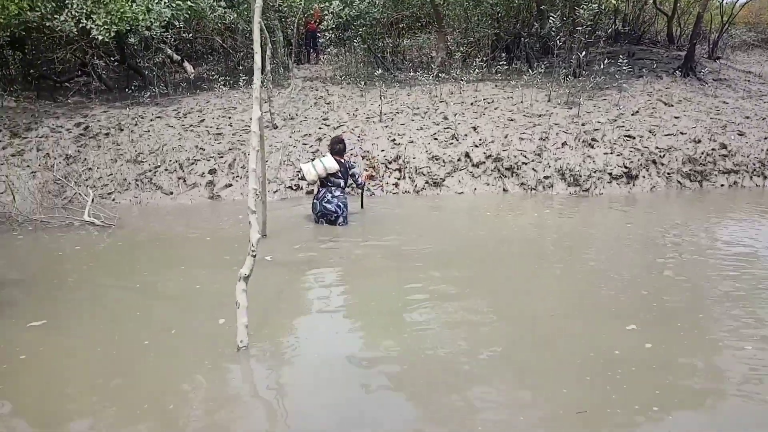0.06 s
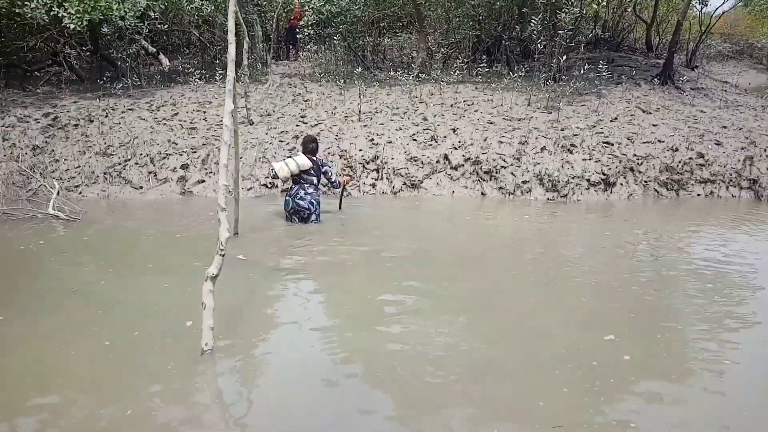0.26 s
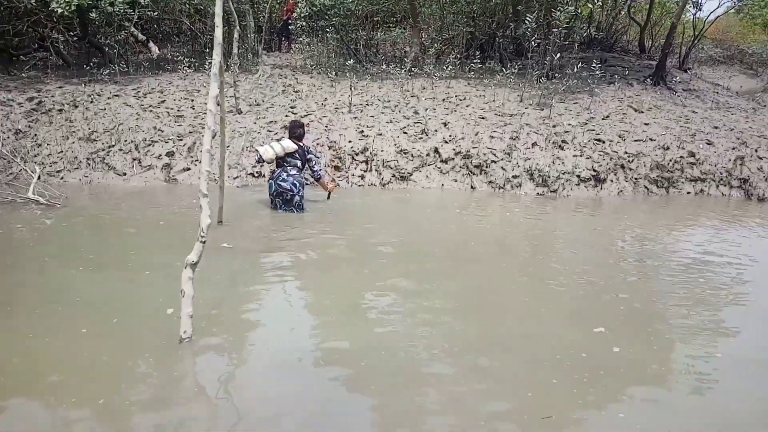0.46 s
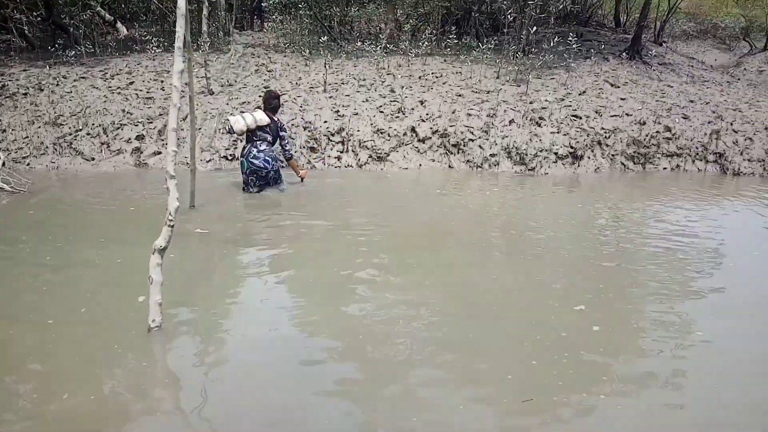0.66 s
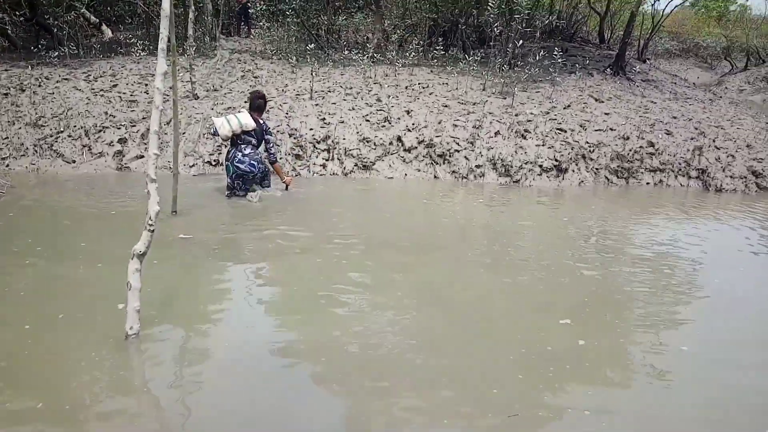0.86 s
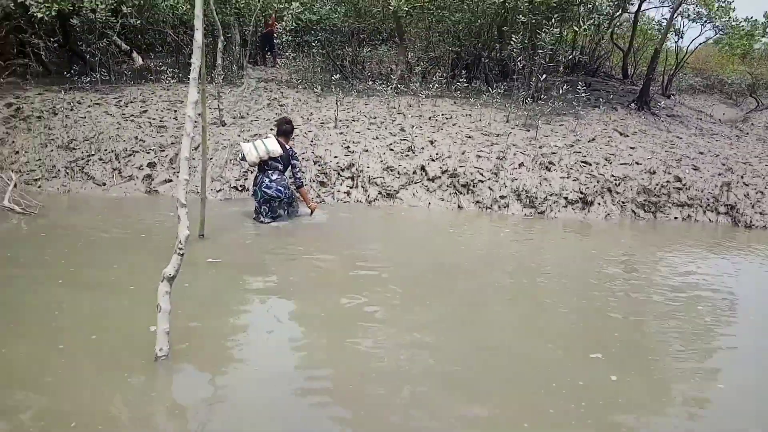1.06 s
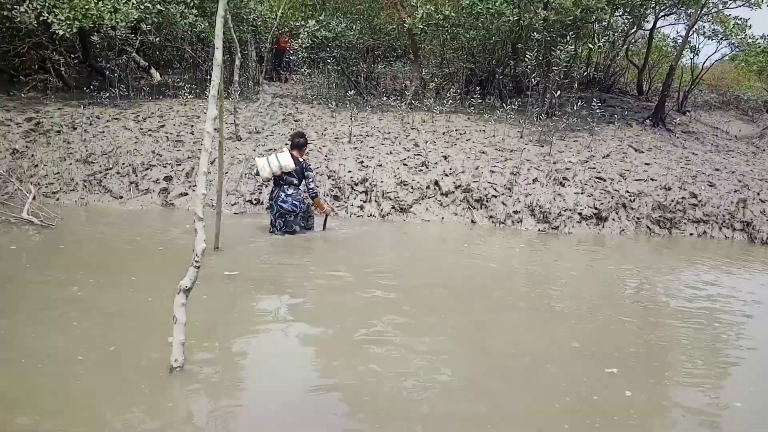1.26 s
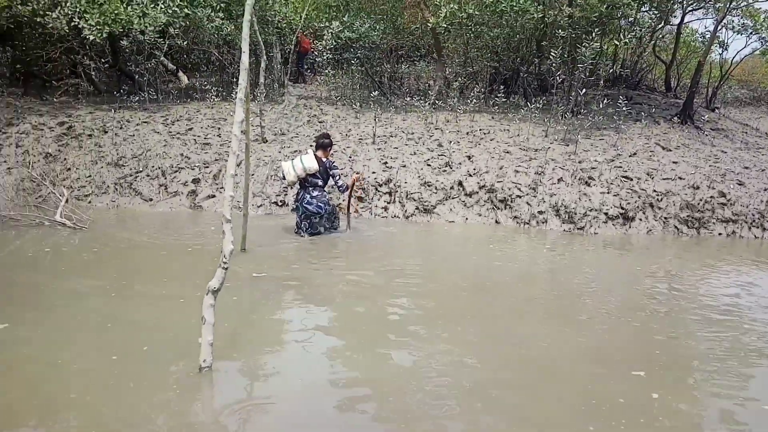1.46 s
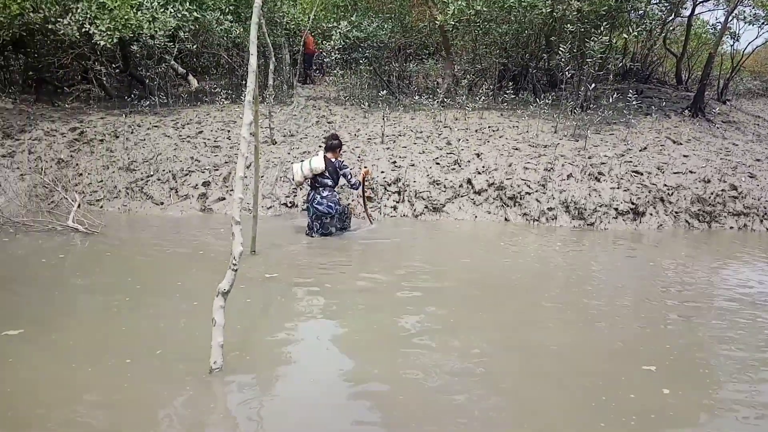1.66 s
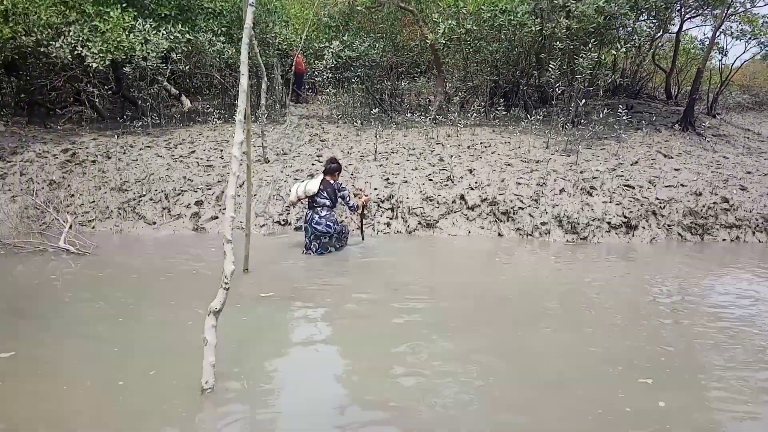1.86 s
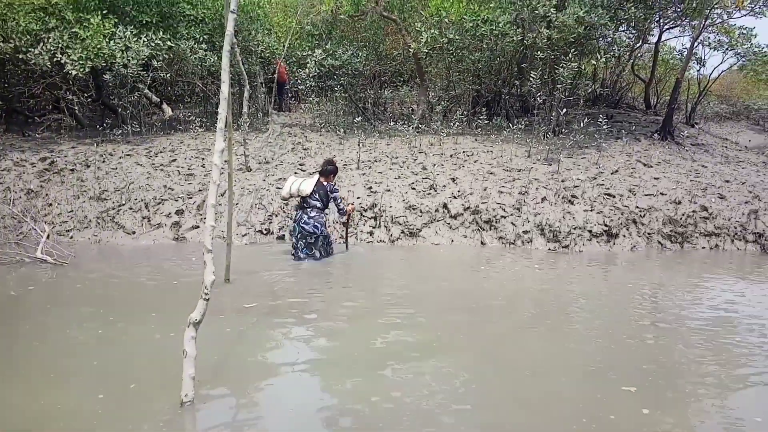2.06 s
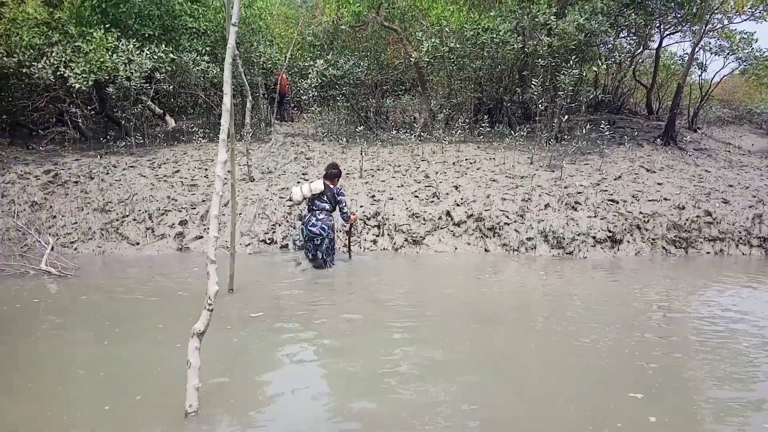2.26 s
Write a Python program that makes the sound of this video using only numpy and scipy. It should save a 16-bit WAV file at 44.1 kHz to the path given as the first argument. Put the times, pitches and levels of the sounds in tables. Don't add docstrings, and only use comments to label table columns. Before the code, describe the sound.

Water splash and long bubbly slosh from wading legs, under a constant high cicada hiss

```python
import sys
import numpy as np
from scipy import signal
from scipy.fft import rfft, irfft
from scipy.io import wavfile
from scipy.ndimage import uniform_filter1d

SR = 44100
rng = np.random.default_rng(int(sys.argv[2]) if len(sys.argv) > 2 else 0)


def attenuation_scalar(level_db):
    decades = np.asarray(level_db, float) / 20
    return 10 ** decades


def generate_wav(signal):
    frames = np.transpose(np.atleast_2d(signal))
    scaled = np.clip(frames, -1, 1) * 32767
    pcm = np.round(scaled).astype(np.int16)
    wavfile.write(sys.argv[1], SR, pcm)


N = 101429


def read(points, hz):
    f, value = np.transpose(points)
    return np.interp(np.log(hz + 1), np.log(f + 1), value)


def evened(x):
    return x / np.sqrt(np.mean(x ** 2) + 1e-20)


def colour(x, points):
    gain = attenuation_scalar(read(points, np.fft.rfftfreq(N, 1 / SR)))
    return evened(irfft(rfft(x) * gain, N))


def add(mix, s, sound):
    part = mix[round(s * SR):][:len(sound)]
    part += sound[:len(part)]


def cicadas():
    # f/Hz, bandwidth/Hz, level/dB, click rate/(1/s)
    bodies = [(5214, 440, -3, 210), (5438, 153, -3, 160), (5724, 104, -5, 210), (6163, 550, -7, 153),
              (6733, 350, -8, 140), (7600, 1070, -11.5, 210), (7940, 540, -22, 140), (8920, 130, -26, 220),
              (11140, 1300, -26.5, 330)]
    # t/s, level/dB
    chorus = [(0, -37.5), (.3, -37.5), (.58, -40), (2.3, -39)]
    t, out = np.arange(N) / SR, np.zeros(N)
    for hz, width, db, per_s in bodies:
        wander = uniform_filter1d(rng.standard_normal(N), size=800)
        clicks = np.cumsum(per_s * (1 + 1.6 * wander)) / SR
        decay = np.exp(-(clicks % 1) / 0.44)
        sound = (0.41 + decay) * rng.standard_normal(N)
        radius = np.exp(-np.pi * width / SR)
        resonance = [1, -2 * radius * np.cos(2 * np.pi * hz / SR), radius * radius]
        for _ in range(2):
            sound = signal.lfilter([1], resonance, sound)
        out += attenuation_scalar(db) * evened(sound)
    return attenuation_scalar(np.interp(t, *np.transpose(chorus)) + 1.0) * evened(out)


def air():
    # f/Hz, level/dB per Hz
    wash_spectrum = [(25, -20), (100, 1.5), (350, -8), (600, -10.5), (1300, -38), (4000, -9.5), (9500, -19),
                     (16000, -23.5)]
    # t/s, level/dB
    tide_levels = [(0, -53.5), (.2, -57.5), (1.05, -76), (1.15, -53.5), (1.62, -65), (1.72, -72),
                   (2.3, -60)]
    # f/Hz, level/dB per Hz
    tide_spectrum = [(200, -52), (290, -1.5), (380, -3.5), (560, -24.5)]
    wash_db = -55.5
    lumps = evened(uniform_filter1d(rng.standard_normal(N), size=3000))
    wash = attenuation_scalar(wash_db + 0.8 * lumps) * colour(rng.standard_normal(N), wash_spectrum)
    tide_gain = attenuation_scalar(np.interp(np.arange(N) / SR, *np.transpose(tide_levels)))
    return wash + tide_gain * colour(rng.standard_normal(N), tide_spectrum)


def blip(hz, cycles, rise):
    u = np.arange(0, 3 * cycles / hz, 1 / SR) * hz / cycles
    shape = (1 - np.exp(-u * 8)) ** 2 * np.exp(-2.2 * u)
    wave = np.sin(2 * np.pi * cycles * u * (1 + rise * u / 2)) * shape
    return wave - shape * wave.sum() / shape.sum()


def grains(lo_hz, hi_hz, per_s, cycles, spread_db, smooth, count=32):
    size = attenuation_scalar(spread_db * np.minimum(rng.exponential(1, N), 3))
    size = size * (rng.random(N) < per_s / SR)
    kind, out = rng.integers(0, count, N), np.zeros(N)
    for k, hz in enumerate(np.geomspace(lo_hz, hi_hz, count)):
        bubble = blip(hz, cycles, 0.22) * hz ** .5
        out += signal.oaconvolve(size * (kind == k), bubble)[:N]
    envelope = uniform_filter1d(abs(rfft(out)) ** 2, size=400) ** .5
    return evened(irfft(rfft(out) / envelope, N)) + smooth * rng.standard_normal(N)


def water():
    # t/s, slosh level/dB, gurgle relative to slosh/dB
    pushes = [(0, -55.5, -4), (.3, -50, -11), (.6, -50, 0), (.73, -45, 0), (.8, -39.5, 4),
              (0.981, -36, -4.5), (1.06, -37.5, -16.5), (1.22, -47, -9.5), (1.45, -60, -3.5),
              (1.88, -62.5, -1), (1.93, -58, 1.5), (2.12, -58, -1.5), (2.3, -46, -14)]
    # t/s, length/s, spray level/dB, gurgle level/dB, mist level/dB
    splashes = [
        (0.122, 0.0057, -36.5, -65, -41),
        (0.166, 0.023, -41, -70, -46),
        (0.3643, 0.035, -13.5, -31, -27.5),
        (0.439, 0.028, -25, -32.5, -44),
        (0.515, 0.041, -35, -31.5, -47),
        (2.062, 0.022, -53, -55, -65),
    ]
    # t/s, length/s, slosh level/dB, gurgle level/dB, mist level/dB
    pours = [(0.214, 0.045, -32.5, -52, -53), (0.23, 0.088, -64, -70, -48), (0.29, 0.052, -42, -50, -51),
             (0.4, 0.054, -31.5, -43.5, -64), (0.604, 0.02, -40.5, -43.5, -46),
             (0.682, 0.036, -40, -64, -55), (0.935, 0.049, -41, -36.5, -46), (2.12, 0.064, -48.5, -53, -62),
             (1.65, 0.089, -52.5, -62, -61), (2.174, 0.05, -38.5, -42.5, -55),
             (2.214, 0.068, -41.5, -37, -54), (2.279, 0.032, -55, -37.5, -64)]
    # t/s, level/dB
    spits = [(.36, -44), (.799, -43), (.817, -44), (.891, -43), (.939, -42), (.971, -44), (1.549, -54)]
    # f/Hz, level/dB per Hz
    slosh_spectrum = [(900, -53), (1600, -8.5), (1800, -1.5), (2350, -1.5), (3500, -4), (4200, -8.5),
                      (8000, -16), (12000, -47)]
    gurgle_spectrum = [(120, -20.5), (250, -6), (500, -1.5), (800, -3), (1400, -2.5), (2200, -8),
                       (4000, -27)]
    mist_spectrum = [(5000, -60), (7400, 8), (8600, -3.5), (10400, -19), (12200, -15), (13600, 3),
                     (15500, -2), (16000, -24)]
    spray_spectrum = [(900, -31), (1550, -44), (1780, 0.5), (2400, -2.5), (3400, -1.5), (4400, -8),
                      (6000, -11), (9500, -36.5)]
    clump_db, mist_share_db, sag_db = 1.2, -17, -7.5
    attack_s, release_s, spit_s = .0015, .006, .003

    t = np.arange(N) / SR
    s, slosh_db, gurgle_share_db = np.transpose(pushes)
    clumps = uniform_filter1d(rng.standard_normal(N), size=300)
    clumps = evened(uniform_filter1d(clumps, size=300))
    db = np.interp(t, s, slosh_db) + clump_db * clumps
    gurgle_db = db + np.interp(t, s, gurgle_share_db)
    power = attenuation_scalar(2 * np.array([db, gurgle_db, db + mist_share_db, db - 99]))
    for start, length, spray_db, gurgle_db, mist_db in splashes:
        u = t - start
        attack = np.clip(u / attack_s, 0, 1)
        sag = attenuation_scalar(sag_db * np.clip(u / length, 0, 1))
        release = np.exp(-np.maximum(u - length, 0) / release_s)
        levels = attenuation_scalar(np.array([gurgle_db, mist_db, spray_db]))
        power[1:] += (levels[:, None] * (attack * sag * release)) ** 2
    for start, length, *levels_db in pours:
        swell = np.sin(np.pi * np.clip((t - start) / length, 0, 1) ** 1.17)
        power[:3] += (attenuation_scalar(np.array(levels_db))[:, None] * swell) ** 2
    for start, mist_db in spits:
        burst = np.exp(-((t - start - spit_s / 2) / spit_s * 2) ** 2)
        power[2] += attenuation_scalar(2 * mist_db) * burst
    swarms = [colour(grains(1176, 7540, 2500, 7.8, 1.8, 1.0), slosh_spectrum),
              colour(grains(283.3, 2604, 1000, 8.0, 4.4, 0.83), gurgle_spectrum),
              colour(grains(6000, 16000, 12000, 8., 1.5, 1.2), mist_spectrum),
              colour(grains(1183, 8050, 2500, 7.8, 2.1, 0.83), spray_spectrum)]
    return (np.sqrt(power) * swarms).sum(0)


def tick(hz, cycles=1.188):
    u = np.arange(0, 4 * cycles / hz, 1 / SR) * hz - 2 * cycles
    return -np.sin(2 * np.pi * u) * np.exp(-(2 * u / cycles) ** 2)


def drops():
    # t/s, level/dB, f/Hz
    strikes = [(0.033, -15.5, 2730), (.052, -33, 2750), (0.1259, -9, 4000), (.2041, -4, 2730),
               (0.2434, -39, 2450), (0.311, -11, 3420), (0.3642, 8, 2900), (.3737, 6, 3400),
               (.3773, 0, 3300), (.387, 2, 2700), (1.4105, -24, 3280), (1.549, -36, 2400),
               (.3938, 3.5, 2300), (0.4542, -7, 740), (0.5155, -4, 893), (0.6998, -8, 2320),
               (.96, -5, 1180), (1.4885, -26, 2020), (1.4482, -30, 2880), (1.6001, -28.5, 1150),
               (1.703, -21, 1940), (2.201, -14, 2530), (2.257, -23, 1800)]
    # t/s, level/dB, f/Hz, cycles
    bubbles = [(0.1658, -20.5, 2530, 15), (0.183, -23.5, 2410, 13), (0.3161, -12.5, 3900, 7.5),
               (0.338, -38, 3600, 74), (.366, -4, 1980, 5.2), (0.3738, -4, 2120, 5.5),
               (0.3766, -7, 2000, 1.7), (0.391, -8, 2560, 8.4), (0.394, -13, 1850, 9.3),
               (0.4368, 1, 2580, 3.6), (0.442, -9.5, 1240, 0.88), (0.5307, -5.5, 3300, 2.7),
               (0.539, -12.5, 2960, 5), (0.542, -19, 433, 2.7), (0.5475, -17.5, 3860, 35),
               (.549, -23.5, 1960, 8.5), (0.606, -22, 1830, 7.1), (0.673, -32.5, 750, 4.4),
               (0.7086, -24.5, 1016, 13.7), (.753, -12.5, 653, 2.4), (0.7532, -16.5, 1485, 8.9),
               (.778, -11, 1930, 3.5), (0.859, -23, 2220, 6.3), (1.7124, -25, 2420, 2.3),
               (1.7635, -31.5, 2170, 2.7), (2.1412, -29.5, 3450, 12), (2.149, -34, 563, 6.2),
               (2.205, -22, 1810, 5.7), (2.2111, -26, 508, 5.3), (2.22, -25.5, 1240, 8.8),
               (2.248, -24.5, 900, 7.1), (2.257, -24.5, 620, 3.6), (2.265, -26, 1660, 15),
               (2.287, -24, 716, 4.5)]
    # t/s, level/dB, f/Hz
    beads = [(0.519, -25, 4000), (.5213, -27, 3320), (.5468, -29, 4640), (.5862, -40, 3445),
             (.5921, -33, 2100), (.6096, -26.5, 1360), (.636, -27, 2030), (.6395, -27.5, 2710),
             (.6909, -29, 2370), (.7174, -23.5, 1900), (.7892, -25, 485), (.7952, -23.5, 3180),
             (0.7955, -24, 1510), (.8047, -28, 2740), (.8321, -34, 1640), (.8526, -29.5, 870),
             (.877, -25, 2070), (.884, -26, 3720), (0.901, -27, 1980), (0.9394, -21.5, 1320),
             (.9453, -20.5, 760), (.9498, -21.5, 3240), (.9598, -19.5, 2020), (1.0087, -26, 3700),
             (1.039, -24, 2130), (1.1686, -30.5, 1940), (1.4053, -40.5, 600), (1.4263, -41, 620),
             (1.4477, -40, 3760), (1.4981, -41, 2220), (1.662, -42, 1894), (1.748, -46, 1520),
             (1.78, -40, 1880), (1.813, -45, 1550), (1.97, -41, 3360), (2.012, -43, 1680),
             (2.0593, -37, 1240), (2.1386, -36, 610), (2.145, -36, 2280), (2.152, -36, 2240),
             (2.167, -34.5, 395), (2.1933, -26, 2020), (2.197, -28, 3020), (2.197, -32, 430),
             (2.2459, -33, 3800), (2.2524, -33, 2630), (2.2958, -28, 2580)]
    # t/s, peak level/dB, f/Hz, length/s, rise as a share of f
    gulps = [
        (0.122, -44, 346.4, 0.06, 0.12),
        (0.3655, -33, 107.5, 0.061, 0.22),
        (.366, -24, 310, 0.0079, 0.11),
        (0.399, -37.5, 241, 0.025, 0.11),
        (0.451, -36, 148, 0.022, 0.1),
        (0.5468, -14, 432, 0.031, 0.41),
        (0.839, -35.5, 205, 0.012, 0.38),
        (1.665, -54, 618, 0.061, 0.75),
    ]
    bead_s = 0.0063
    out = np.zeros(N)
    for s, db, hz, cycles in bubbles:
        add(out, s, attenuation_scalar(db) * blip(hz, max(cycles, 1), 0.028))
    for s, db, hz in beads:
        add(out, s, attenuation_scalar(db) * blip(hz, hz * bead_s, 0.013))
    for s, db, hz in strikes:
        add(out, s - 1 / hz, attenuation_scalar(db - 12) * tick(hz))
    for s, db, hz, length, rise in gulps:
        u = np.arange(0, length, 1 / SR) / length
        wave = np.sin(2 * np.pi * hz * length * u * (1 + rise * u / 2))
        shape = np.minimum(u * 8, 1) * np.cos(np.pi / 2 * u ** 1.3) ** 2
        add(out, s, attenuation_scalar(db) * wave * shape)
    return out


def whines():
    # start t/s, length/s, top t/s, top f/Hz, bend/(Hz/s^2)
    flights = [
        (1.89, .17, 2.025, 14560, 105000),
        (1.96, .18, 2.066, 13780, 115000),
        (1.995, .11, 2.071, 13010, 100000),
        (2.05, .075, 2.091, 15340, 330000),
    ]
    whine_db = -65
    out = np.zeros(N)
    for start, length, top_s, top_hz, bend in flights:
        t = np.arange(0, length, 1 / SR)
        turns = np.cumsum(top_hz - bend * (t + start - top_s) ** 2) / SR
        swell = np.sin(np.pi * t / length) ** .5
        add(out, start, attenuation_scalar(whine_db) * swell * np.sin(2 * np.pi * turns))
    return out


def trickle():
    # start t/s, length/s, level/dB
    runoff = (1.91, .25, -55)
    # f/Hz, level/dB per Hz
    runoff_spectrum = [(1900, -26), (2200, -3), (2450, 2), (2800, -25)]
    start, length, db = runoff
    swell = np.sin(np.pi * np.clip((np.arange(N) / SR - start) / length, 0, 1)) ** 0.39
    bubbles = grains(2080, 2330, 300, 9.0, 3.2, .3, count=6)
    return attenuation_scalar(db) * swell * colour(bubbles, runoff_spectrum)


def scene():
    mono = cicadas() + air() + water() + drops() + whines() + trickle()
    return np.array([mono, mono])


def low_pass(x):
    return signal.sosfilt(signal.butter(12, 16650, fs=SR, output="sos"), x)


def record(dry):
    edge_hz = 15780
    lowpass = signal.firwin(1023, edge_hz, window=("kaiser", 9), fs=SR)
    mix = signal.oaconvolve(dry, lowpass[None], "same")
    mix = mix * np.minimum(np.arange(N, 0, -1) / 100, 1)
    return low_pass(mix)


dry = scene()
out = record(dry)
generate_wav(out)
```